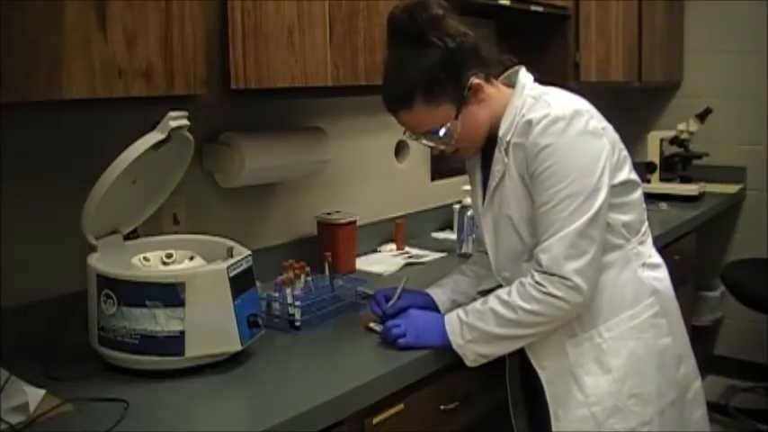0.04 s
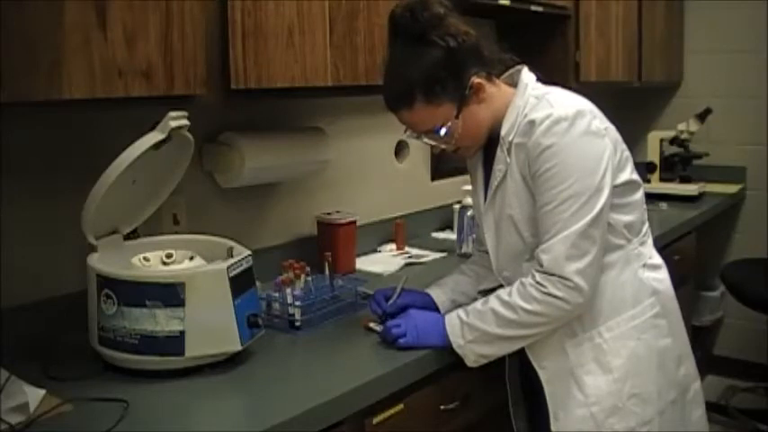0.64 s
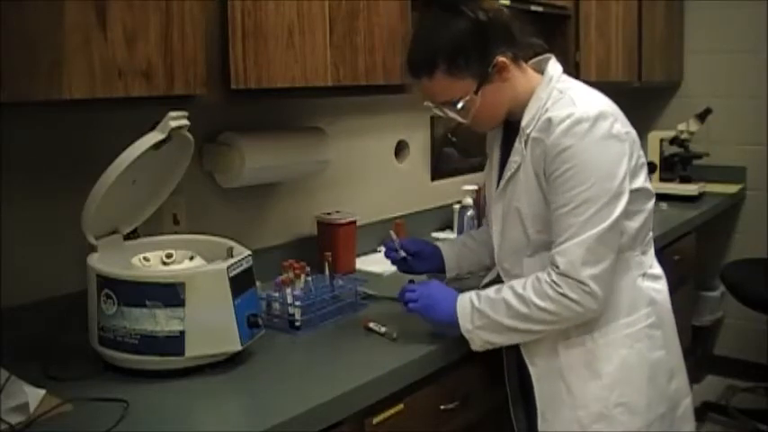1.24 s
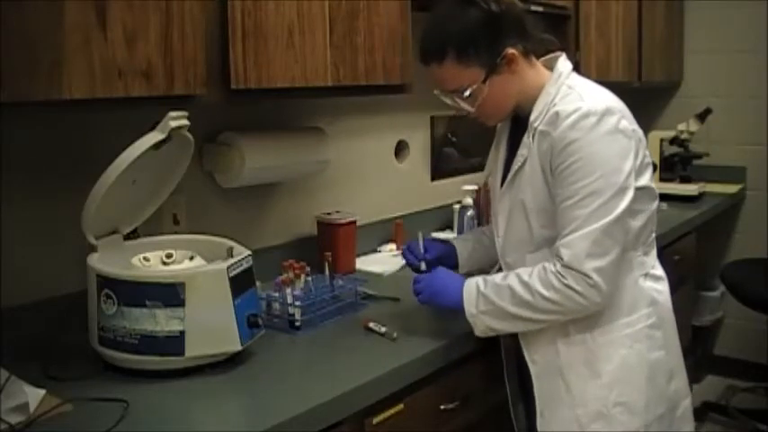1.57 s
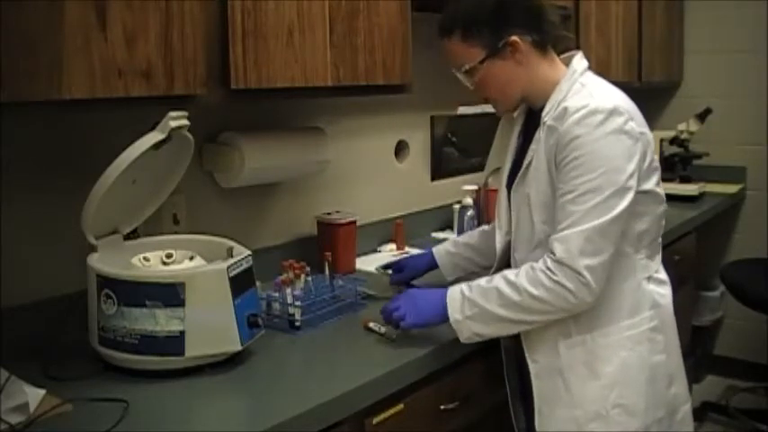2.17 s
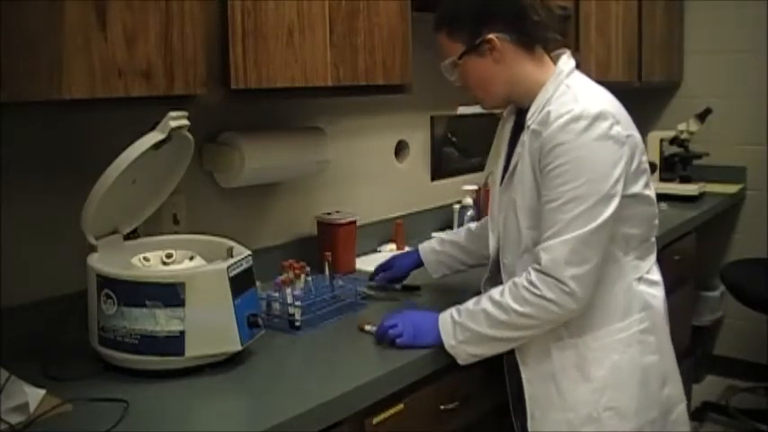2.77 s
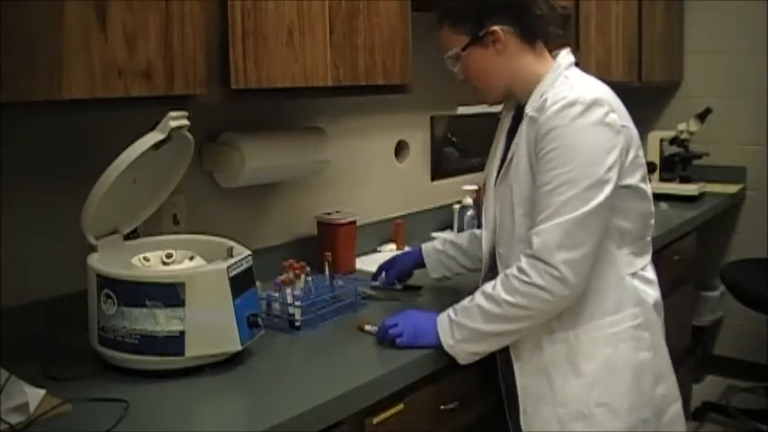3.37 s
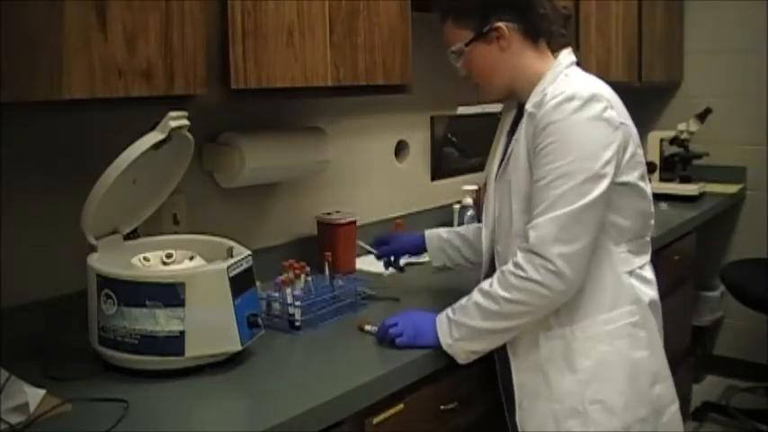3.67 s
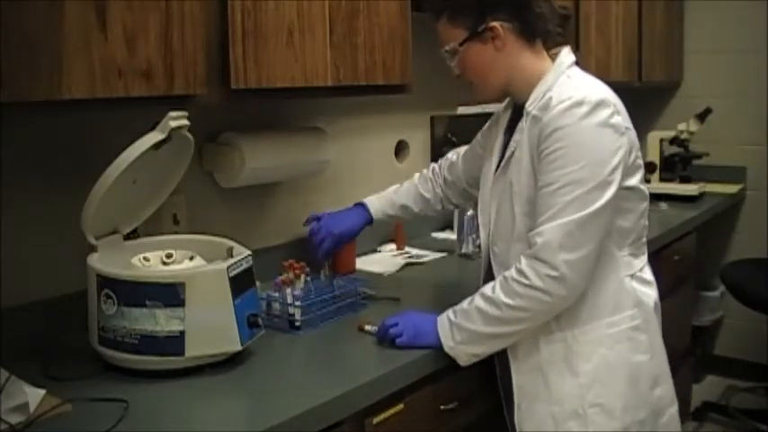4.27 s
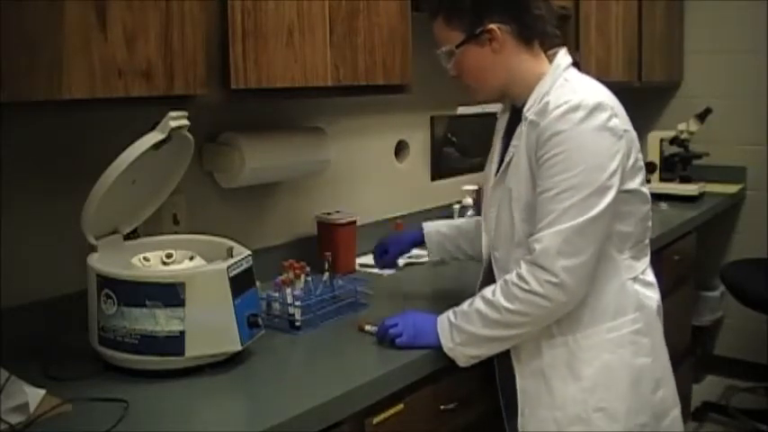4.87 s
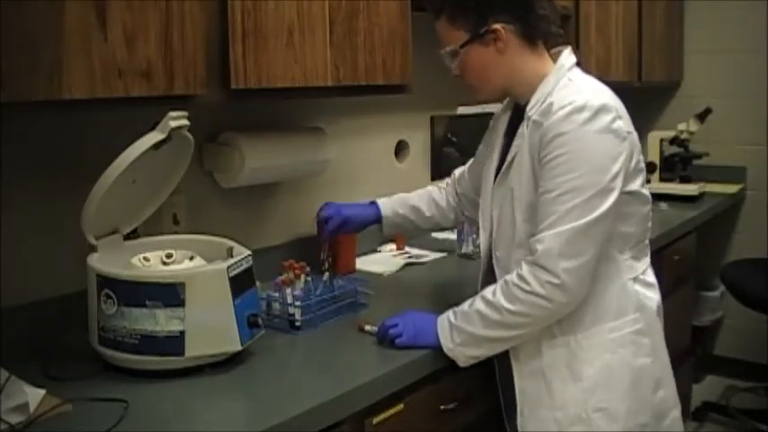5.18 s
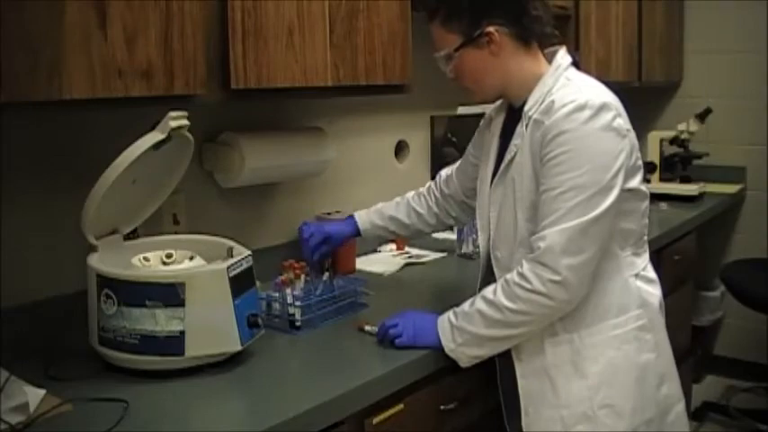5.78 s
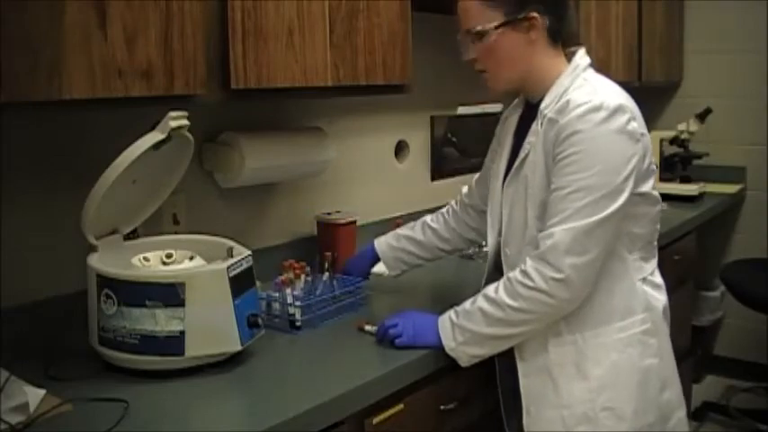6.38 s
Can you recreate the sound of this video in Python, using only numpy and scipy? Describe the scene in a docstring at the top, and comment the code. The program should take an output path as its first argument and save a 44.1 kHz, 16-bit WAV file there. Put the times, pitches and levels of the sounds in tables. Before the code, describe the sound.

Ventilation hums steadily throughout in a small, quiet lab, and gloves and a coat rustle faintly on and off. At about 1.5 seconds a marker pen's cap gives a few light plastic clicks. The pen snaps shut with a sharp clack near 2.2 seconds and is laid on the worktop with duller knocks around 2.4 seconds. After a faint click, from about 4.3 to 4.6 seconds a light plastic item scrapes in tiny slips over the rim of a hollow plastic cup, ticking and softly bumping its wall. A second item taps sharply as it is picked up at 4.7 seconds. Scraping returns from 5.6 seconds, and just before 6 seconds the item drops in with a quick rattle, the loudest sound, leaving the cup briefly ringing. A tiny click and a rustle follow at 6.5 seconds. The sounds are fairly close, with a short room echo.

```python
"""Pen and plastic cup on a lab bench

A marker pen is capped and laid down with sharp clicks and duller knocks. Then a gloved hand twice
pushes a light plastic item over the rim of a hollow plastic cup: it scrapes in tiny slips, bumps the
wall, and the second time drops in and rattles, leaving the cup ringing. Gloves and coat rustle
faintly, the ventilation hums behind it all, and the small room adds a short echo."""
import sys
import numpy as np
from scipy import signal
from scipy.fft import rfft, irfft
from scipy.io import wavfile
from scipy.ndimage import uniform_filter1d

SR = 44100
rng = np.random.default_rng(int(sys.argv[2]) if len(sys.argv) > 2 else 0)


def persist_wave(psi):
    """Save psi, clipped to +-1, as 16-bit WAV."""
    counts = np.round(np.clip(psi, -1, 1) * 32767).astype(np.int16)
    wavfile.write(sys.argv[1], SR, np.atleast_2d(counts).T)


N = 292074
T = np.arange(N) / SR
HZ = np.maximum(np.arange(N // 2 + 1) * SR / N, 1)

# the bright crack of a hit on the worktop or cup: pitch_hz, width_hz, level_db
CRACK = [(2480, 1100, -0.44), (3650, 1600, 0.8), (4600, 390, -0.54), (6300, 410, -1), (6600, 580, -1)]
# the very high tick of a thin, hard edge: pitch_hz, width_hz, level_db
TICK = [(8400, 1300, -1), (9300, 820, -11), (11200, 1500, -13)]
# the item rattles in the cup: start_s, level_db, brightness_db_per_octave, thud_db, room_db
CUP_KNOCKS = [(5.9454, -3.5, 1, -11.5, -7.5), (5.9690, -18.5, -9.5, 2, -12.5), (5.9812, -21.5, -4, -1, -8),
              (5.9928, -10, 1, -8, -4), (6.0073, -13, 1, -6, -10.5), (6.0167, -15.5, 3.5, -19, -11),
              (6.0195, -18, -3, -10, -5)]
CUP_ECHO = (0.001207, 0.52)   # a close echo off the worktop: delay_s at brightness 0, share of the first blow


def from_db(db):
    """Turn decibels into a number to multiply by."""
    return 10 ** (np.asarray(db) / 20)


def rms_one(x):
    """Scale a signal to an average strength (rms) of 1."""
    return x / np.sqrt(np.mean(x ** 2) + 1e-20)


def at_hz(points, hz):
    """Read between the rows of a table, with octaves evenly spaced."""
    pitches, values = np.transpose(points)
    return np.interp(np.log(hz), np.log(pitches), values)


def drift(rate_hz):
    """A smooth random wobble of strength 1, mostly slower than rate_hz."""
    return rms_one(irfft(rfft(rng.standard_normal(N)) / (1 + (HZ / rate_hz) ** 2), N))


def stereo_noise(db, alike):
    """Noise shaped by db at each pitch; alike (0 to 1) says how well left and right match."""
    mid, side = rfft(rng.standard_normal((2, N)))
    alike = np.clip(alike, 0, .99)
    left_right = np.sqrt(1 + alike) * mid + np.sqrt(1 - alike) * side * [[1], [-1]]
    return rms_one(irfft(from_db(db) * left_right, N))


def evened(noise, width_hz):
    """The spectrum of a noise with its broad humps levelled and its fine grain kept."""
    spectrum = rfft(noise)
    bins = max(int(width_hz * noise.shape[-1] / SR), 3)
    return spectrum / np.sqrt(uniform_filter1d(np.abs(spectrum) ** 2, bins, axis=-1) + 1e-20)


def body(modes, size=4096):
    """How an object answers one tap. Modes are the pitches it rings at; wider ones die sooner."""
    hz = np.maximum(np.arange(size // 2 + 1) * SR / size, 1)
    power = sum(from_db(db) ** 2 / (1 + ((hz * hz - centre ** 2) / (hz * width)) ** 2)
                for centre, width, db in modes)
    low_hz, high_hz = .75 * modes[0][0], 1.15 * modes[-1][0]
    power = power / (1 + (low_hz / hz) ** 8) / (1 + (hz / high_hz) ** 10)
    # a struck object gives its energy as early as it can (minimum phase)
    cepstrum = irfft(np.log(power + 1e-9))[:size // 2]
    cepstrum[0] = 0
    ring = irfft(np.exp(rfft(cepstrum, size)))
    return ring / np.abs(ring).max()


def sound(force, response):
    """Every push in the force starts its own copy of the response."""
    return signal.oaconvolve(np.atleast_2d(force), np.atleast_2d(response), axes=1)[:, :N]


def chatter(fade_s=0.0011):
    """A hard edge lands in a flurry of tiny touches a millisecond or two long."""
    t = T[:256]
    touches = rng.standard_normal(len(t)) * np.exp(-t / fade_s)
    flurry = irfft(evened(touches, width_hz=500))
    return flurry / np.linalg.norm(flurry)


def blows(rows, rebound, mix_db=0, touch=lambda: np.ones(1)):
    """The force of hits that each sound twice, as a second landing or a close echo. Row 0 is for the straight
    path, row 1 for the room."""
    start_s, db, brightness, _, room_db = np.transpose(rows)
    delay_s, share = rebound
    starts = np.round(start_s * SR).astype(int)
    # a hit duller by 15 dB per octave repeats twice as late
    lags = np.round(delay_s * 2 ** (-brightness / 15) * SR).astype(int)
    force = np.zeros((2, N))
    for at, lag, level_db, send_db in zip(starts, lags, db + mix_db, room_db):
        push = from_db([[level_db], [level_db + send_db]]) * touch() / np.hypot(1, share)
        force[:, at:at + push.shape[1]] += push
        force[:, at + lag:at + lag + push.shape[1]] += share * push
    return force


def contacts(rows, knock, crack, tick, crack_db, tick_db, rebound):
    """Each hit rings, low to high, as a thud, knock, crack and tick; brightness tilts the top two."""
    # the low thud of a hollow body: pitch_hz, width_hz, level_db
    thud = [(252, 99, -18), (383, 38, 0), (464, 120, -8), (590, 110, -23)]
    brightness, thud_db = np.transpose(rows)[2:4]
    out = sound(blows(rows, rebound, thud_db), body(thud))
    out += sound(blows(rows, rebound), body(knock))
    for modes, db in ((crack, crack_db), (tick, tick_db)):
        octaves = np.log2(np.mean(modes, axis=0)[0] / np.mean(knock, axis=0)[0])
        out += sound(blows(rows, rebound, db + brightness * octaves, chatter), body(modes))
    return out


def ventilation(air_db=-45.5, waver_db=1.55, wander_radians=0.71):
    """Air rushes through ducts that boost some pitches, over a hum of wavering tones."""
    # the rush of air: pitch_hz, level_db
    air = [(20, -20), (45, -10.5), (60, -14), (100, -17), (128, -8.5), (160, -5), (300, 2), (560, -2.5),
           (1050, -3), (1450, -8.5), (2000, -11.5), (2800, -17.5), (4500, -24.5), (8800, -31), (12000, -40),
           (16000, -52)]
    # where the ducts ring: pitch_hz, width_hz, boost_db
    duct = [(156.1, 2.9, 14.4), (236, 30, 1.9), (300, 7.5, 3.5), (310, 10.4, 5.8), (515.6, 41, 6.1),
            (543, 17, 4.8), (700, 19, 2.2), (817, 54, 3.8), (1028, 38, 6.4), (1784, 71, 8), (1940, 49, 5.6)]
    # tones of fans, mains and electronics: pitch_hz, level_db
    tones = [(40, -98), (119.7, -63.5), (239.5, -57), (251, -50.5), (549, -59.5), (678, -60), (872, -67.5),
             (980, -58.5), (1276, -68), (15735, -88)]
    # how alike the air sounds left and right: pitch_hz, likeness (0 to 1)
    likeness = [(60, 0.024), (150, 0.56), (380, 0.91), (950, 0.74), (2380, 0.73), (5980, 0.31),
                (15000, 0.13)]
    boost_db = sum(boost / (1 + (2 * (HZ - hz) / width) ** 2) for hz, width, boost in duct)
    hum = np.zeros(N)
    for hz, db in tones:
        level = from_db(db + waver_db * drift(18.0))
        hum += level * np.sin(2 * np.pi * hz * T + wander_radians * drift(1.9))
    rush = stereo_noise(at_hz(air, HZ) + boost_db, at_hz(likeness, HZ))
    return from_db(air_db) * rush + hum


def rustle(resting_db=-80, grain_db=1.0):
    """Sleeve and gloves rub with a fine, uneven hiss that swells and fades with each movement."""
    # hand movements: middle_s, length_s, level_db
    moves = [(.35, 0.077, -67), (0.795, 0.13, -58), (1.078, 0.33, -58), (1.86, 0.66, -60.5),
             (2.7, 0.79, -67.5), (3.472, 0.45, -61), (4.04, 0.52, -61), (4.995, 1, -65.5),
             (5.71, 0.093, -60), (6.237, 0.27, -60.5), (6.522, 0.26, -56.5)]
    # the hiss of cloth and rubber: pitch_hz, level_db
    colour = [(1500, -4), (3000, -5), (5500, -7.5), (8800, -4.5), (10500, -9), (13000, -19.5), (16000, -32)]
    swells = [from_db(db) * .5 ** ((2 * (T - middle) / length) ** 2) for middle, length, db in moves]
    level = np.sqrt(from_db(resting_db) ** 2 + np.sum(np.square(swells), axis=0))
    grain = from_db(grain_db * drift(45))
    return level * grain * stereo_noise(at_hz(colour, HZ), alike=0.43)


def light_clicks():
    """Plastic clicks: the pen cap and small parts in the hand, and one tick of the item on the rim."""
    # the clicks: start_s, level_db, brightness_db_per_octave, thud_db, room_db
    hits = [(1.471, -62, 8.5, -20, -9), (1.506, -65, 7, -20, -3), (1.5687, -52.5, 6, -23, -4),
            (1.5946, -30.5, 1.5, -19, -3), (1.5990, -58, -2, -22, -13), (4.1035, -41.5, 0, -25, 0.5),
            (4.4828, -28.5, -7, -4.5, -4.5), (6.4995, -47.5, 5.5, -20, -7)]
    # how small parts ring, low to high: pitch_hz, width_hz, level_db
    knock = [(1150, 300, -3), (1410, 300, 0), (1880, 710, -3)]
    crack = [(2620, 710, -0.5), (3200, 600, -7), (3770, 830, 0), (5000, 1500, -13)]
    tick = [(6900, 1200, 2), (8500, 1400, 2), (9500, 660, 3), (11100, 1400, -19)]
    return contacts(hits, knock, crack, tick, crack_db=-1.6, tick_db=-.5, rebound=(.00035, 0.32))


def pen_clacks():
    """The pen's barrel rings as it is snapped shut and clacks down."""
    # the clacks: start_s, level_db, brightness_db_per_octave, thud_db, room_db
    hits = [(2.1686, -23, 2, -9, -6), (2.1735, -24.5, 2.5, -2, -15.5), (2.1775, -29, 1, -9, -7),
            (2.3741, -26, 1.5, -13, -4), (2.4466, -38.5, 0, -2, 0)]
    # how the barrel rings, low to high: pitch_hz, width_hz, level_db
    knock = [(760, 220, -6), (1010, 200, -14), (1510, 150, 1.5), (2050, 330, 6)]
    crack = [(2500, 400, 1), (3640, 700, 0.5), (4800, 1100, -2), (6150, 1200, -3), (7060, 1300, -4.5)]
    return contacts(hits, knock, crack, TICK, crack_db=3.6, tick_db=-6, rebound=(.00055, 0.14))


def bench_knocks():
    """The worktop gives duller knocks as the pen is laid on it."""
    # the knocks: start_s, level_db, brightness_db_per_octave, thud_db, room_db
    hits = [(2.4014, -17.5, -3, -6.5, -5.5), (2.4313, -22.5, -2, -1, -8.5), (2.4490, -31, -0.5, -13, -3.5)]
    # how the worktop rings: pitch_hz, width_hz, level_db
    knock = [(785, 120, -3), (1090, 260, 1), (1480, 280, 2), (1800, 170, -0.5), (2150, 300, -3)]
    return contacts(hits, knock, CRACK, TICK, crack_db=-3.5, tick_db=-16, rebound=(0.00108, 0.15))


def rim_scrapes(slips_per_s=3500, rise_s=0.0018, fade_db=7):
    """Plastic drags over the rim in tiny slips, hardest at first; it rasps and the wall flexes."""
    # the scrapes: start_s, length_s, rasp_db, hiss_db (added to rasp_db), flex_db, rasp_pitch_ratio
    strokes = [(4.2837, 0.052, -39, -3.5, -41, 0.92), (4.464, 0.0093, -51, 2.5, -45, 1.3),
               (4.476, 0.019, -37.5, -7.5, -44, 0.95), (4.495, 0.04, -51.5, -8, -45, 1.8),
               (4.576, 0.03, -33.5, -2.5, -37, 0.995), (5.618, 0.076, -59, -10, -84, 1.2),
               (5.776, 0.015, -49, -2.5, -69, 1.17), (5.8772, 0.028, -36, -0.5, -40, 1),
               (5.922, 0.066, -40.5, -6, -38.5, 0.79), (5.958, 0.052, -54.5, 10, -51, 0.64)]
    # the rim's low flexing, middle rasp and high hiss: pitch_hz, width_hz, level_db
    flex = [(145, 33, -4), (212, 68, 0.5), (420, 50, 2), (665, 690, -4)]
    rasp = [(1180, 320, -2.5), (1595, 250, -0.5), (1914, 160, 1.5), (2150, 240, -2.5), (3040, 830, -4.5)]
    hiss = [(4000, 1400, -1.5), (5260, 3000, -3.5), (7900, 2800, -4.5), (9660, 550, 3), (10800, 2000, -19)]
    out = np.zeros(N)
    for start_s, length_s, rasp_db, hiss_db, flex_db, ratio in strokes:
        t, at = T[:int(length_s * SR)], int(start_s * SR)
        tuned_rasp = [(hz * ratio, width, db) for hz, width, db in rasp]
        for modes, db in ((flex, flex_db), (tuned_rasp, rasp_db), (hiss, rasp_db + hiss_db)):
            chance, size = rng.random(SR // 4)[:len(t)], rng.standard_normal(SR // 4)[:len(t)]
            slips = (chance < slips_per_s / SR) * size
            friction = rms_one(irfft(evened(slips, width_hz=100), len(t)))
            force = friction * np.minimum(t / rise_s, 1) * from_db(db - fade_db * t / length_s)
            response = body(modes)
            stroke = sound(force, response / np.linalg.norm(response))[0]
            out[at:at + len(stroke)] += stroke
    return np.array([out, out])   # the same for the straight path and the room


def wall_bumps():
    """A push against the cup sets its soft wall swinging for a few cycles."""
    # the item bumps the wall: start_s, level_db
    bumps = [(4.291, -33), (4.476, -31), (4.509, -33), (4.592, -40), (5.882, -28), (5.989, -32.5)]
    # the wall's slow swing: pitch_hz, width_hz, level_db
    wall = [(147, 31, -0.5), (223, 78, -5)]
    force = np.zeros(N)
    for start_s, db in bumps:
        force[int(start_s * SR)] = from_db(db)
    return sound(force, body(wall))[0]


def item_tap():
    """The second plastic item taps as it is picked up."""
    # the tap: start_s, level_db, brightness_db_per_octave, thud_db, room_db
    hits = [(4.7396, -20, 1.5, -13, -4.5)]
    # how the item rings, low to high: pitch_hz, width_hz, level_db
    knock = [(580, 200, -11), (1580, 330, 0), (2000, 300, -4), (2480, 450, -6)]
    crack = [(4040, 630, -1.8), (4540, 560, -0.19), (6650, 1000, -2)]
    return contacts(hits, knock, crack, TICK, crack_db=-7, tick_db=-19, rebound=(0.00118, 0.1))


def cup_rattle():
    """The item lands in the hollow cup and bounces about."""
    # the cup's knock: pitch_hz, width_hz, level_db
    knock = [(760, 140, -3.5), (1060, 280, -3), (1290, 150, 4.5), (1540, 190, -2), (1720, 230, 0),
             (1960, 200, -1), (2160, 210, -3.5), (2360, 300, -18)]
    return contacts(CUP_KNOCKS, knock, CRACK, TICK, crack_db=-12, tick_db=-17, rebound=CUP_ECHO)


def cup_ring(ring_db=-38, swell_s=0.002):
    """The knocks in the cup leave it ringing."""
    # the cup's lingering tones: pitch_hz, level_db, fade_s (time to fall 60 dB)
    tones = [(143.7, 2.5, 0.41), (223, -6, 0.34), (346, 13, 0.33), (416, -2, 0.23), (756, -2, 0.21),
             (851, 10, 0.33), (1000, 2, 0.45), (1008, 9, .33), (1179, 8, 0.4), (1134, 8, 0.22),
             (1310, 10.5, 0.37), (1520, -2, 0.25), (1630, 0, 0.2), (1650, -8, .2), (1860, 1, 0.26),
             (1942, 11, 0.23), (2006, 15, 0.18), (2240, 11, 0.35)]
    t = T[:SR // 2]
    ring = sum(from_db(db - 60 * t / fade_s) * np.sin(2 * np.pi * (hz * t + rng.random()))
               for hz, db, fade_s in tones)
    force = blows(CUP_KNOCKS, CUP_ECHO, ring_db)[0]
    return sound(force, ring * (1 - np.exp(-t / swell_s)))[0]


def over_worktop(x, lag_s=0.00123, bounce=0.25, low_cut_hz=480, boost_hz=1640, boost=0.89, gain_db=-2):
    """The straight path has thin bass and strong knocks; the worktop adds one close, dull echo."""
    thin = signal.sosfilt(signal.butter(2, low_cut_hz, "high", fs=SR, output="sos"), x)
    straight = thin + boost * signal.lfilter(*signal.iirpeak(boost_hz, Q=3.5, fs=SR), thin)
    delayed = np.interp(T - lag_s, T, straight)
    dulled = signal.lfilter([.5], [1, -.5], delayed)
    return from_db(gain_db) * (straight + bounce * dulled)


def room(x, gap_s=0.0002, early_db=3, early_s=0.021, echo_db=7.5):
    """Echoes die at their own speed at each pitch; near cupboards and the wall thicken the first."""
    # how long echoes last: pitch_hz, fade_s (time to fall 60 dB)
    fades = [(150, 0.5), (500, 0.28), (1100, 0.54), (1650, 0.41), (2100, 0.41), (2800, 0.4), (4700, 0.41),
             (9000, 0.29), (15000, 0.032)]
    # how alike they are left and right: pitch_hz, likeness (0 to 1)
    likeness = [(100, 0.83), (300, 0.97), (1400, 0.86), (3000, 0.77), (7000, 0.55), (14000, 0.065)]
    t = T[:int(SR * .7)]
    hz = np.maximum(np.arange(len(t) // 2 + 1) * SR / len(t), 1)
    noise = rfft(stereo_noise(0 * HZ, at_hz(likeness, HZ))[:, :len(t)])
    band_hz, band_fade_s = np.transpose(fades)
    tail = 0
    for share, fade_s in zip(np.eye(len(fades)), band_fade_s):
        band = np.interp(np.log(hz), np.log(band_hz), share)
        tail = tail + irfft(noise * band, len(t)) * from_db(-60 * t / fade_s)
    tail *= from_db(early_db * np.exp(-t / early_s))
    tail = irfft(evened(tail, width_hz=127), len(t))
    tail *= np.clip(t / gap_s - .5, 0, 1)   # fade in
    tail *= np.clip(2 - 2 * t / t[-1], 0, 1) ** 2   # fade out
    return from_db(echo_db) * sound(x, tail / np.sqrt(np.sum(tail ** 2) / 2))


def scene():
    """Small things and the cup sound over the worktop and echo, amid rustle and ventilation."""
    small_straight, small_to_room = light_clicks() + pen_clacks() + bench_knocks() + item_tap()
    cup_straight, cup_to_room = cup_rattle() + rim_scrapes()
    close = over_worktop(small_straight + cup_straight)
    echoes = room(small_to_room) + room(cup_to_room)
    return close + cup_ring() + wall_bumps() + echoes + rustle() + ventilation()


def record(dry, cutoff_hz=15900):
    """The left microphone is a little louder in the middle range; the highest treble is cut."""
    # the balance of the two microphones: pitch_hz, left_minus_right_db
    balance = [(60, -6.5), (150, 1), (350, 1.5), (700, 3), (1300, 3.5), (2400, 1.5), (4400, 1), (9000, 1)]
    coloured = irfft(rfft(dry) * from_db(at_hz(balance, HZ) * [[.5], [-.5]]), N)
    return signal.sosfilt(signal.ellip(10, .1, 80, cutoff_hz, fs=SR, output="sos"), coloured)


dry = scene()
out = record(dry)
persist_wave(out)
```